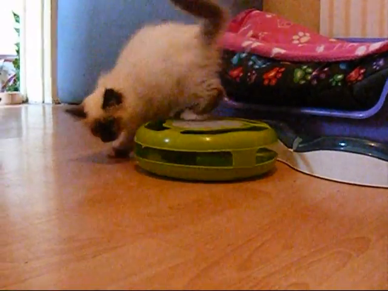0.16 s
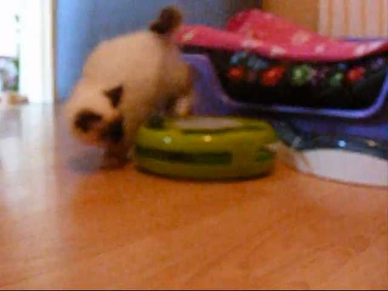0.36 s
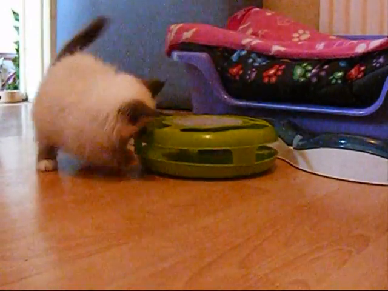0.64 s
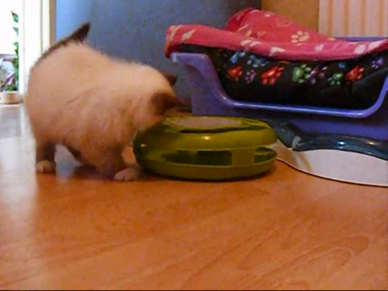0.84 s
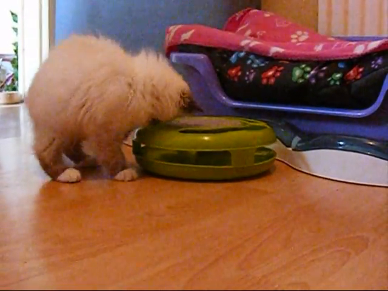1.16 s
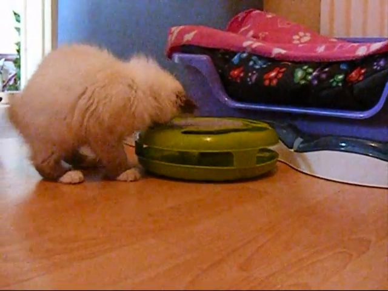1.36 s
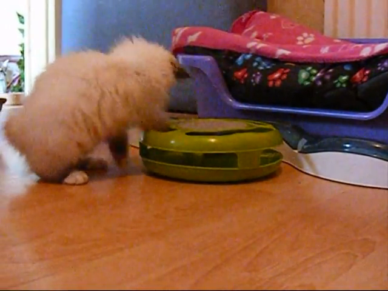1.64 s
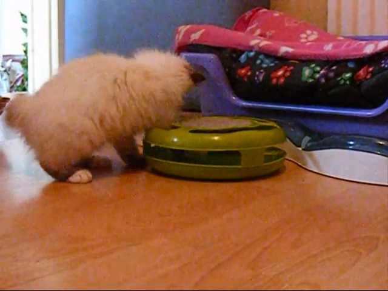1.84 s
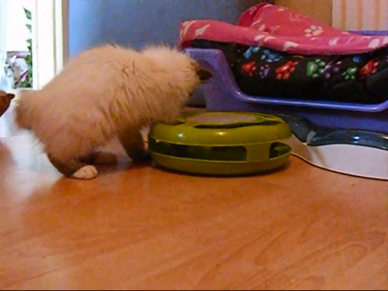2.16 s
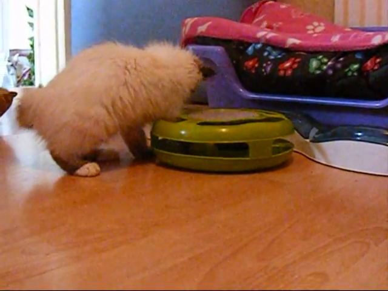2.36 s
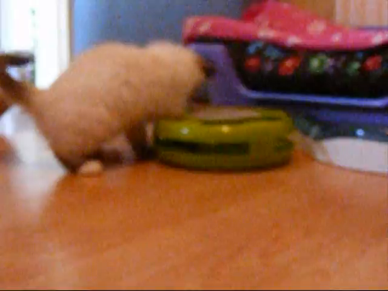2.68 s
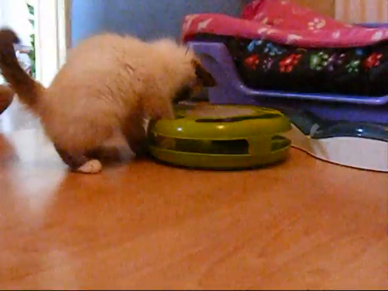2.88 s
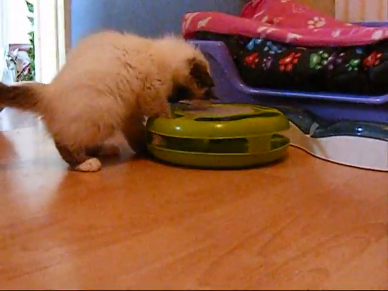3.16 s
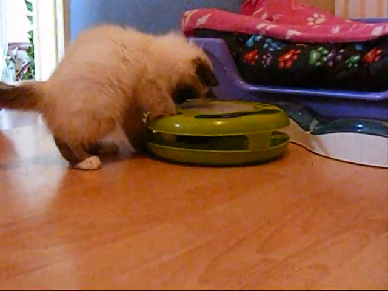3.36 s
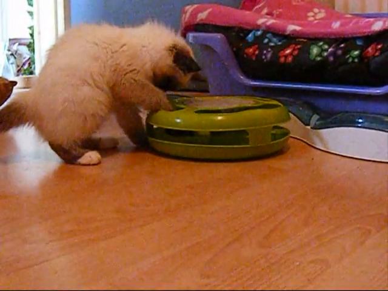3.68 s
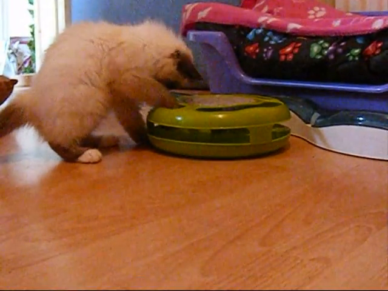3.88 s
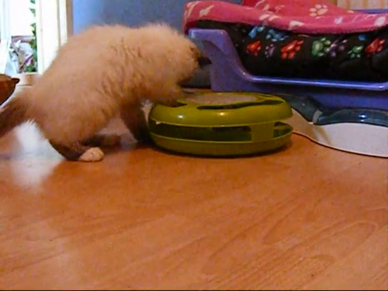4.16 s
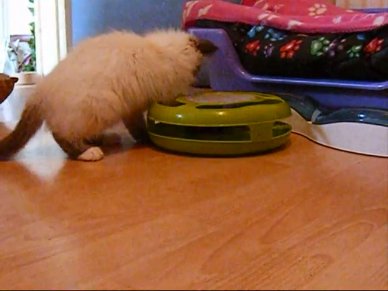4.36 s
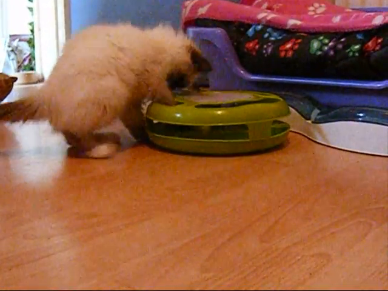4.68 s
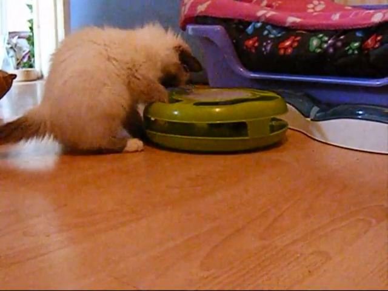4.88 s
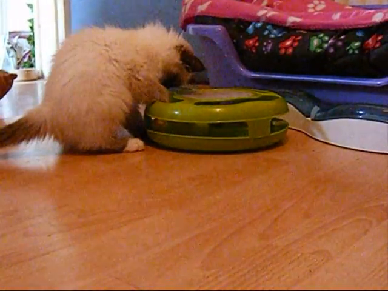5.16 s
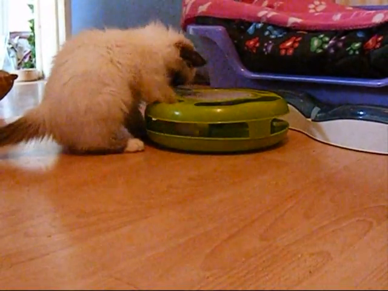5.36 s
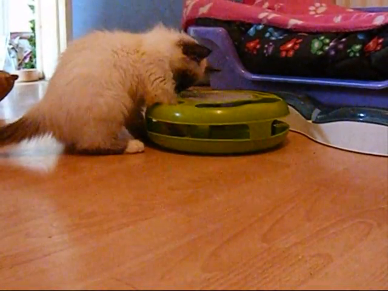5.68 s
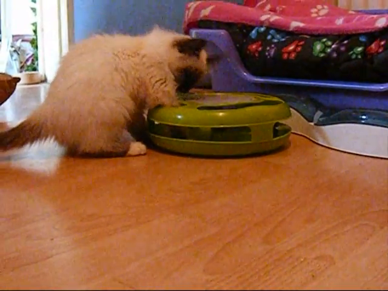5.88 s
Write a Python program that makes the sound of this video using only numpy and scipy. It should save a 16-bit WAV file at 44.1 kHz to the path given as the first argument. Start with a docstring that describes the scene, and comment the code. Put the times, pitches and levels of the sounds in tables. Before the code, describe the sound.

Early on, a hard plastic knock with a small pop rings out, followed by lens clicks and near quiet. Later a ball strikes its hollow track in quick irregular bunches, rattling, briefly rolling and rasping. Faint paw taps and fur brushes fall between. The small room answers with short reflections; the camera's focus ticks stay dry and close over soft hiss, with muffled treble.

```python
"""A small room with a hard floor: a kitten bats a plastic ball round a hollow plastic track toy.
The ball's knocks ring the shell and its air channel, tiny bumps make its rumble, narrow noise its rasp.
Paws land as short dull tones, light ticks are noise bursts, and fur brushes the rim as swelling noise.
The camera's focus motor ticks through its own body, with no room on it.
Everything sits over the hiss of a narrow-band microphone."""
import sys
import numpy as np
from scipy import signal
from scipy.fft import rfft, irfft, next_fast_len
from scipy.io import wavfile

SR = 44100
rng = np.random.default_rng(int(sys.argv[2]) if len(sys.argv) > 2 else 0)


def dump(signal):
    """Clip the signal to [-1, 1] and save it as 16-bit WAV at the path in sys.argv[1]."""
    limited = np.clip(np.atleast_2d(signal).T, -1, 1)
    pcm = np.round(limited * 32767).astype(np.int16)
    wavfile.write(sys.argv[1], SR, pcm)


N = 265482

# Crack of a contact, the dense short modes of the shell.
# Each row: frequency in Hz, relative level in dB.
CRACK_COLOUR = [(40,-25),(130,-9),(300,-0.5),(750,7.5),(1050,-4.5),(1700,-11.5),(2400,1.5),(3400,2),(4300,-6),(5000,-21.5),(5500,-58)]
# Air resonances of the hollow ball channel.
# Each row: frequency in Hz, relative level in dB, time to fall 60 dB in seconds.
CHANNEL_MODES = [(289.7,-4.5,0.12),(640.8,7,0.098),(682,-5.5,0.17),(766,-6.5,0.15),(1758,7,0.025),(1762,-25.5,0.11),(2151,3.5,0.034)]


def amp(db):
    """Decibels to gain."""
    return 10 ** (np.asarray(db) / 20)


def unit(x, size=None):
    """Scales to rms 1, judged on the first size samples."""
    return x / np.sqrt(np.mean(x[:size] ** 2) + 1e-20)


def read(points, hz):
    """Reads a table on a log-frequency axis."""
    f, value = np.transpose(points)
    return np.interp(np.log(hz + 1), np.log(f + 1), value)


def add(mix, s, sound):
    """Mixes a sound in at time s, in seconds."""
    part = mix[max(round(s * SR), 0):][:len(sound)]
    part += sound[:len(part)]


def noise(spectrum, size):
    """Noise of rms 1 with the given spectrum."""
    gain = amp(read(spectrum, np.fft.rfftfreq(size, 1 / SR)))
    return unit(irfft(rfft(rng.standard_normal(size)) * gain, size))


def band(x, hz, kind, order=3):
    """Causal Butterworth filter."""
    return signal.sosfilt(signal.butter(order, hz, kind, fs=SR, output="sos"), x)


def ring(modes, t, phases):
    """Sum of dying sines."""
    hz, db, t60 = np.transpose(modes)[:, :, None]
    return (amp(db - 60 * t / t60) * np.sin(2 * np.pi * hz * t + phases[:, None])).sum(0)


def struck(modes, t):
    """A set of modes at rms 1; each contact point excites them in other phases."""
    return unit(ring(modes, t, rng.uniform(0, 2 * np.pi, len(modes))), size=900)


def knocks(level_db=-14, crack_t60=0.038, lag=.001, soft_db=-30, range_db=17, channel_db=-2,
           shell_db=-2.0, rattle_db=-4, rattle_t60=0.045, rattles_per_s=900):
    """Each blow cracks and rebounds; hard ones ring and rattle the shell, soft ones mostly the channel air."""
    # The ball striking the track. Each row: time in seconds, relative level in dB,
    # extra thud of the base in dB, brightness in dB.
    hits = [(0.005,-22,7,-1.5),(0.11,-30.5,13,3),(0.1815,-2,-1,-2),(0.58,-18,2.5,0.5),(1.837,-27,-11,1.5),(1.85,-18.5,4.5,-2.5),(1.992,-31.5,14.5,-7.5),
            (3.004,-25,9,-3),(3.018,-17.5,-5,-2),(3.034,-15,-12.5,-0.5),(3.068,-21.5,-21,4.5),(3.097,-29.5,4.5,1),(3.448,-31.5,15.5,-11),(3.477,-18.5,0,5),(3.5,-12.5,1,0),(3.526,-20,20,-1),(3.546,-18.5,9,-4),(3.46,-22.5,1,0.5),
            (4.163,-13.5,-5,-7),(4.172,-12,1.5,1),(4.195,-24.5,3.5,-11),(4.41,-16.5,-6,6.5),(4.673,-26.5,9.5,-3),(4.688,-23.5,1,-3.5),(4.696,-16.5,-3,0.5),(4.734,-20,-7,2.5),
            (4.792,-12,3,-1.5),(4.802,-11.5,8.5,-2),(4.931,-21.5,-9.5,0.5),(4.953,-21,-17,0.5),(4.976,-31.5,-1,-10.5),(5.585,-13,-6,7),(5.631,-24.5,9,-3)]
    # Modes of the plastic track.
    # Each row: frequency in Hz, relative level in dB, time to fall 60 dB in seconds.
    track_modes = [(145,-15,0.17),(195.7,1.5,0.19),(300,10,0.16),(371,-21,0.69),(498,-14.5,0.56),(585,3,0.086),(659,10,0.05),(680,-17,0.39),(741,19.5,0.062),(898.3,9,.13),(1286,-4,0.095),(1670,4.5,0.075),(1730,-2.5,0.064),(1584,1.5,0.022),(2190,-3,0.17),(1990,-32,0.1),(2480,-4.5,0.013),(2287,4,0.057),(2400,-0.5,0.14),(2620,-25,.11),(3450,11.5,0.0098),(3100,-12,0.11),(3800,-12.5,0.6)]
    # Bands from thud to treble. Each row: lower edge in Hz, upper edge in Hz.
    bands_hz = ((85, 450), (450, 1200), (1200, 2200), (2200, 6000))
    bass_db, treble_db = -8, -3  # of an ordinary knock, against its middle
    rebound_s, rebound_db, rebound_dull_db = .019, -12, -5  # it comes back once, softer and duller
    slowest_contact_s = 0.0013  # how slowly the softest knocks set in

    out, t = np.zeros(N), np.arange(11250) / SR
    rebounds = [(s + rebound_s, db + rebound_db, thud, bright + rebound_dull_db)
                for s, db, thud, bright in hits]
    for s, db, thud, bright in hits + rebounds:
        hard = np.clip((db - soft_db) / range_db, 0, 1)
        crack = unit(noise(CRACK_COLOUR, len(t)) * amp(-60 * t / crack_t60), size=900)
        # the loose halves of the shell chatter
        chatter = rng.choice([-1., 1.], len(t)) * (rng.random(len(t)) < rattles_per_s / SR)
        rattle = unit(band(chatter, (1500, 4200), "band")) * amp(rattle_db - 60 * t / rattle_t60)
        shell = amp(shell_db) * struck(track_modes, t) + rattle
        air = amp(channel_db) * struck(CHANNEL_MODES, t)
        blow = crack + np.sqrt(hard) * shell + np.sqrt(1 - hard) * air
        blow = blow * (1 - np.exp(-t / (slowest_contact_s * (1 - hard) + 1 / SR)))
        # a sharper contact trades body for treble
        colour = (bass_db + thud, -bright, 0, treble_db + bright)
        for edges, rel in zip(bands_hz, colour):
            part = unit(band(blow, edges, "band"), size=900)
            add(out, s + lag, amp(db + rel + level_db) * part)
    return out


def rolling(level_db=-9, bumps_per_s=250, spread_db=5, ring_db=-3, crack_t60=0.044, low_hz=120, count=6):
    """The ball runs over tiny bumps, each a small blow on one of several spots of the shell."""
    # The ball rolling after a push.
    # Each row: start in seconds, length of the push in seconds, relative level in dB.
    pushes = [(0.0,0.013,-30.5),(0.068,0.15,-32),(0.24,0.083,-30),(1.85,0.055,-47),(1.98,0.056,-40),(2.978,0.14,-26),(3.461,0.098,-29.5),(4.673,0.17,-25),(4.859,0.12,-30)]
    # Colour of the rumble inside the hollow ring. Each row: frequency in Hz, relative level in dB.
    hollow_colour = [(110,-23.5),(290,5.5),(420,-20.5),(560,-11.5),(700,-4),(880,5.5),(1050,-9.5),(1450,0),(1750,3),(1950,-9.5),(2300,-5),(2900,-7),(3900,-17.5),(5200,-29)]
    rise_s, slows_db_per_s = .025, 200.5

    t, level, out = np.arange(SR // 4) / SR, np.zeros(N), np.zeros(N)
    age = np.arange(SR) / SR
    sizes = amp(spread_db * np.minimum(rng.exponential(1, N), 3)) * rng.choice([-1, 1], N)
    bumps = unit((rng.random(N) < bumps_per_s / SR) * sizes)
    spot = rng.integers(0, count, N)
    for s, push, db in pushes:  # it gathers speed, keeps it while pushed, then coasts
        coasting_db = -slows_db_per_s * np.maximum(age - push, 0)
        add(level, s, np.minimum(age / rise_s, 1) * amp(db + level_db + coasting_db))
    for k in range(count):
        crack = unit(noise(hollow_colour, len(t)) * amp(-60 * t / crack_t60), size=900)
        shell = crack + amp(ring_db) * struck(CHANNEL_MODES, t)
        out += signal.oaconvolve(bumps * level * (spot == k), shell / np.linalg.norm(shell))[:N]
    return band(out, low_hz, "high")  # the rumble carries little bass


def rasps(rise_s=0.0023, fade_db=-22):
    """Rubbing excites one narrow resonance of the channel and fades as the ball comes free."""
    # The ball rasping along the channel wall.
    # Each row: start in seconds, length in seconds, starting level in dB.
    rubs = [(1.852,0.11,-40.5),(1.991,0.053,-39.5),(3.068,0.09,-24.5),(3.596,0.027,-28.5),(4.871,0.09,-38),(5.615,0.038,-38)]
    rasp_hz, half_width = 1771, .055  # upper air resonance, half width as a share of it

    out = np.zeros(N)
    edges = (rasp_hz * (1 - half_width), rasp_hz * (1 + half_width))
    for s, length, db in rubs:
        t = np.arange(0, length, 1 / SR)
        rub = band(rng.standard_normal(SR // 2), edges, "band", order=2)
        swell = np.minimum(t / rise_s, 1) * amp(db + fade_db * t / length)
        add(out, s, unit(rub[-len(t):]) * swell)  # the end of the noise, once the filter has settled
    return out


def kitten_and_ticks(paw_t60=0.02, tick_t60=0.033, brush_width=0.17):
    """Paw falls are short dull tones, light ticks dry cracks, brushing fur swells of band noise."""
    # Paws landing on the floor. Each row: time in seconds, level in dB, pitch in Hz.
    paws = [(0.069,-26,542),(0.083,-51,640),(0.760,-40.5,584),(0.906,-42.5,640),(1.259,-48,645),(3.845,-42.5,635)]
    # Light ticks, some of them from the lens. Each row: time in seconds, level in dB.
    ticks = [(1.034,-45),(1.311,-41),(1.433,-49),(3.332,-41),(3.927,-38),(4.136,-37.5),(4.152,-33.5),(4.533,-44)]
    # Fur brushing the rim. Each row: start in seconds, length in seconds, level in dB, centre in Hz.
    brushes = [(1.893,0.047,-42,3520),(2.614,0.027,-36,3000),(2.877,0.073,-48.5,2900),(5.227,0.11,-43,1930),(5.421,0.11,-50.5,2180)]

    out, t = np.zeros(N), np.arange(SR // 10) / SR
    soft_start = 1 - np.exp(-t / 0.00087)  # a soft pad starts the board gently
    for s, db, hz in paws:
        pad = np.sin(2 * np.pi * hz * t) * amp(-60 * t / paw_t60) * soft_start
        add(out, s, amp(db) * unit(pad, size=250))
    for s, db in ticks:
        tick = noise(CRACK_COLOUR, len(t)) * amp(-60 * t / tick_t60)
        add(out, s, amp(db) * unit(tick, size=150))
    for s, length, db, hz in brushes:
        hairs = rng.standard_normal(SR // 2)[:int(length * SR)]
        hairs = band(hairs, (hz * (1 - brush_width), hz * (1 + brush_width)), "band", order=2)
        add(out, s, amp(db) * unit(hairs) * signal.windows.tukey(len(hairs), .8))
    return out


def room(x, first=.005, turns_per_s=3, count=3):
    """Dense reflections, each band dying at its own speed; sets of paths swell and fade in turn."""
    # Decay of the room. Each row: frequency in Hz, time to fall 60 dB in seconds.
    decay_times = [(150,0.4),(400,0.14),(1000,0.32),(2800,0.27),(5000,0.38)]
    out, size = np.zeros(N), SR // 3
    for k in range(count):
        taps = rng.choice([-1., 1.], size) * (rng.random(size) < .1)
        taps = taps * (np.arange(size) / SR > first)
        hz, t, z = signal.stft(taps, SR, nperseg=256)
        decay = amp(-60 * t / read(decay_times, hz)[:, None])
        tail = signal.istft(z * decay, SR, nperseg=256)[1]
        turn = turns_per_s * np.arange(N) / SR + k / count
        share = np.sqrt(2 / count) * np.cos(2 * np.pi * turn)
        out += signal.oaconvolve(x * share, tail / np.linalg.norm(tail))[:N]
    return out


def lens_bursts(rows, step_hz, count, first_force, level_db, treble_db, barrel_db, grit, grit_t60,
                split_hz=1800):
    """A few uneven motor steps shake the camera body and set the lens barrel ringing."""
    # Short modes of the camera body.
    # Each row: frequency in Hz, relative level in dB, time to fall 60 dB in seconds.
    body_modes = [(861,0,0.037),(1300,6.5,0.026),(1457,1.5,0.051),(1770,11,0.0092),(2193,10.5,0.013),(2590,11,0.012),(3970,12,0.015),(5000,-4.5,0.014)]
    # The barrel rings on, quickly at first and then faintly.
    # Each row: frequency in Hz, relative level in dB, time to fall 60 dB in seconds.
    barrel_modes = [(876.5,-5,0.087),(856.7,-11.5,0.33)]
    drive_s = .011  # each burst holds off the barrel's decay this long

    out, t, long = np.zeros(N), np.arange(2048) / SR, np.arange(SR // 4) / SR
    body = unit(ring(body_modes, t, np.pi * np.arange(len(body_modes))), size=200)
    free = np.maximum(long - drive_s, 0)
    barrel = sum(amp(db - 60 * free / t60) * np.sin(2 * np.pi * hz * long) for hz, db, t60 in barrel_modes)
    barrel = barrel * (1 - np.exp(-long / 0.002))
    for s, db, ringing in rows:
        burst = np.zeros(len(t))
        scratches = band(rng.standard_normal((count, len(t))), (600, 5000), "band")
        scratches = scratches * amp(-60 * t / grit_t60)
        for k, force in enumerate(np.linspace(first_force, 1, count)):
            step = force * (body + grit * unit(scratches[k], size=200))
            add(burst, (k + abs(rng.normal(0, .08))) / step_hz, step)  # each step a little late
        low = unit(band(burst, split_hz, "low"), size=400)
        high = unit(band(burst, split_hz, "high"), size=400)
        add(out, s, amp(db + level_db) * low + amp(db + treble_db) * high)
        add(out, s, amp(db + ringing + barrel_db) * barrel)
    return out


def focus(whine_hz=2690):
    """The autofocus hunts: a quick buzz, a slower clack, now and then a thin whine."""
    # The motor runs briefly, then the lens clacks to a halt. Each row: time of the halt in seconds,
    # relative level of the run in dB, of the halt in dB, extra ring of the barrel in dB.
    moves = [(0.1,-28,-23,0),(0.332,-23,-19,2.5),(0.366,-30.5,-19,-2.5),(0.4,-24,-18.5,-7),(0.43,-29,-18.5,-5.5),(0.565,-21,-15,-1),(0.633,-40,-13.5,6),(0.832,-26.5,-29.5,3.5),
             (1.133,-41,-46,16),(1.531,-27.5,-36,3),(2.2,-35.5,-32,-11),(2.266,-26.5,-23,6),(2.332,-34,-25.5,-6.5),(2.4,-28,-24,9),(2.532,-26.5,-21.5,7.5),(2.635,-19.5,-15,-5),
             (2.666,-23,-12,-0.5),(2.733,-20,-17.5,-0.5),(2.767,-27,-15,6.5),(2.8,-24,-15,-11),(2.83,-21,-27,-2),(2.866,-50,-16,6.5),(3.0,-22.5,-20,2.5),(3.435,-27,-21.5,0),
             (4.033,-26.5,-22,-4.5),(4.335,-23,-26,-4),(4.636,-19.5,-17.5,-2.5),(5.966,-33,-21.5,-2)]
    # Thin whine of the lens between bursts. Each row: start in seconds, length in seconds, level in dB.
    whines = [(0.913,0.086,-56),(1.413,0.077,-49.5),(2.427,0.084,-51.5),(5.462,0.12,-52.5)]
    run_s = .016  # the run starts this long before the halt

    runs = [(s - run_s, db, ringing) for s, db, _, ringing in moves]
    halts = [(s, db, ringing) for s, _, db, ringing in moves]
    out = lens_bursts(runs, step_hz=1412, count=8, first_force=1.0, level_db=-11.0, treble_db=-22,
                      barrel_db=-8.0, grit=0.46, grit_t60=0.044)
    out += lens_bursts(halts, step_hz=451.2, count=3, first_force=1.3, level_db=-14, treble_db=-22,
                       barrel_db=-14, grit=0.27, grit_t60=0.094)
    for s, length, db in whines:
        tone = np.sin(2 * np.pi * whine_hz * np.arange(0, length, 1 / SR))
        add(out, s, amp(db) * unit(tone) * signal.windows.tukey(len(tone), .5))
    return out


def pops(decay=0.0018):
    """As the recorder's gain steps down, the signal dips, swings a little past rest and relaxes."""
    # Soft low pops at the sharpest knocks. Each row: time in seconds, relative level in dB.
    dips = [(0.181,-12.5),(4.42,-18.5),(5.591,-20.5)]
    out, u = np.zeros(N), np.arange(SR // 10) / SR / decay
    for s, db in dips:
        add(out, s, -amp(db) * band((1 - u / 2) * np.exp(-u), 860, "low", order=1))
    return out


def microphone_hiss(level_db=-46, low_hz=52):
    """Steady coloured noise, thinned below the microphone's low limit."""
    # Each row: frequency in Hz, relative density in dB per Hz.
    hiss_colour = [(15, -36.5), (25, -9.5), (33, -2), (86, -9.5), (115, -9.5), (154, -8), (281, -9.5),
                   (329, -11), (368, -10), (674, -10.5), (825, -13), (2590, -15), (5300, -23), (6890, -46),
                   (11700, -120)]
    return band(amp(level_db) * noise(hiss_colour, next_fast_len(N))[:N], low_hz, "high")


def limit(x, ceiling_db=-11, attack=0.007, share=0.3):
    """A quick limiter takes off a share of the excess level, once a knock's first swing has passed."""
    keep = np.exp(-1 / (attack * SR))
    power = signal.lfilter([1 - keep], [1, -keep], x ** 2)
    level_db = 10 * np.log10(power + 1e-12)
    return x / amp(min(share, 1) * np.maximum(level_db - ceiling_db, 0))


def scene(room_db=-1.5):
    """Toy, kitten and light ticks sound in the room; focus motor, pops and hiss stay dry."""
    play = knocks() + rolling() + rasps() + kitten_and_ticks()
    return (play + amp(room_db) * room(play) + focus() + pops() + microphone_hiss())[None]


def record(dry, offset=-0.02, cutoff_hz=5400):
    """After the limiter, the converter sits slightly off zero, clips at full scale and loses the treble."""
    clipped = np.clip(limit(dry) + offset, -1, 1)
    lowpass = signal.firwin(401, cutoff_hz, window=("kaiser", 8), fs=SR)
    return signal.oaconvolve(clipped, lowpass[None], "same")


dry = scene()
out = record(dry)
dump(out)
```